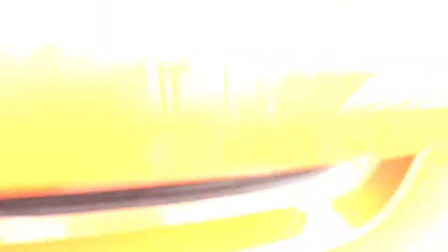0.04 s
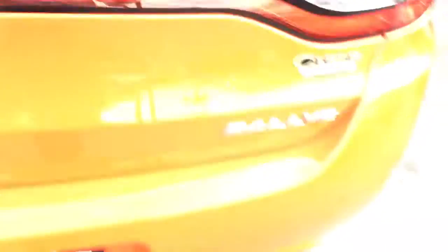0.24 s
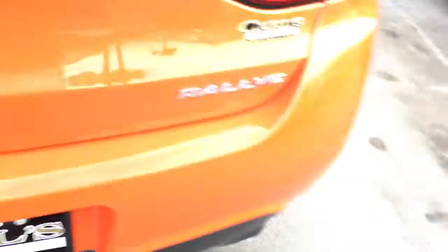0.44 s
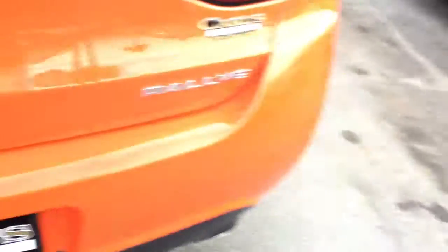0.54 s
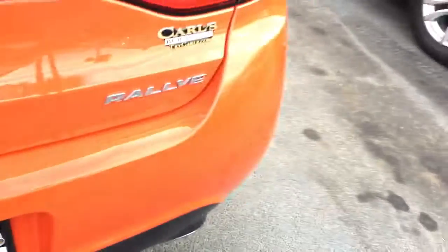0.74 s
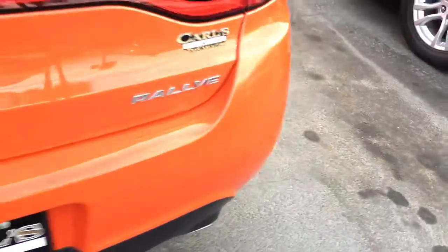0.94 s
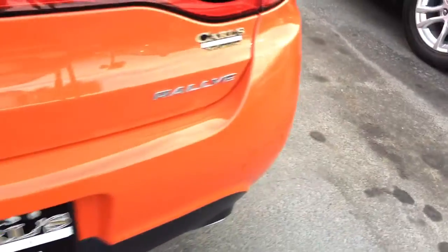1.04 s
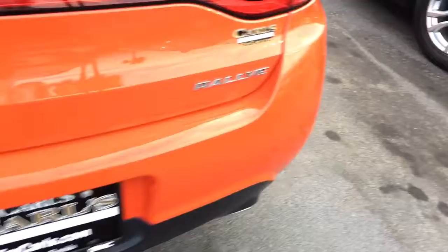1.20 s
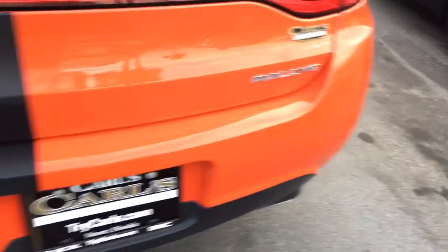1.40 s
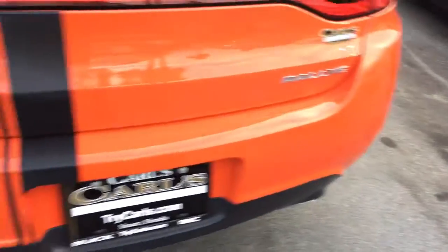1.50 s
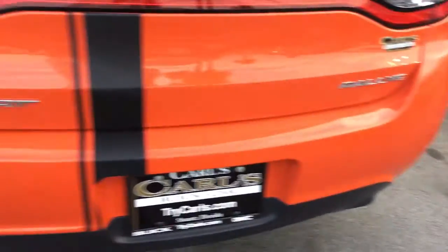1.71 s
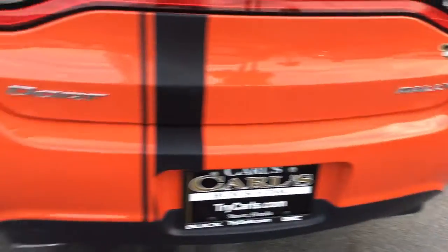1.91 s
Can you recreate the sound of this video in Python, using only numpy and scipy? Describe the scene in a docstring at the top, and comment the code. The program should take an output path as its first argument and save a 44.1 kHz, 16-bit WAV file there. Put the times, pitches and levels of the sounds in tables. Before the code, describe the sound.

One hard car trunk slam with latch clatter and low boom, then quiet idling and wind rumble.

```python
"""Trunk slam beside an idling engine

A car's trunk lid is slammed once, close by, in an open lot: the latch clatters, the panels ring, the air booms.
These are bursts of coloured noise, decaying sines and one low sine, with a diffuse noise tail around them.
Wavering low tones make the engine, shaped noise the wind, the outdoor wash and a few soft scuffs.
The recorder's gain ducks under the slam, holds and recovers."""
import sys
import numpy as np
from scipy import signal
from scipy.fft import rfft, irfft
from scipy.io import wavfile
from scipy.ndimage import uniform_filter1d, minimum_filter1d

SR = 44100
rng = np.random.default_rng(int(sys.argv[2]) if len(sys.argv) > 2 else 0)


def master(y):
    """Save y as 16-bit WAV."""
    cut = np.clip(np.atleast_2d(y).T, -1, 1)
    pcm = np.round(cut * 32767)  # scale
    wavfile.write(sys.argv[1], SR, pcm.astype(np.int16))


N = 85995  # length in samples


def amp(db):
    """Decibels to gain."""
    return 10 ** (np.asarray(db) / 20)


def unit(x):
    """Scales to an rms of one."""
    return x / np.sqrt(np.mean(abs(x) ** 2) + 1e-20)


def read(points, hz):
    """Reads a table on a log-frequency axis."""
    table_hz, value = np.transpose(points)
    return np.interp(np.log(hz + 1), np.log(table_hz), value)


def noise(colour, tilt_db=0):
    """Steady noise of rms one, shaped by a colour table and a tilt in dB per octave."""
    hz = np.fft.rfftfreq(N, 1 / SR)
    shape_db = read(colour, hz) + tilt_db * np.log2(hz + 1)
    white = rfft(rng.standard_normal(N))
    return unit(irfft(white * amp(shape_db), N))


def drift(width_hz):
    """Complex random motion of rms one, kept slow by a Gaussian lowpass."""
    hz = np.fft.fftfreq(N, 1 / SR)
    white = rng.standard_normal(N) + 1j * rng.standard_normal(N)
    return unit(np.fft.ifft(np.fft.fft(white) * np.exp(-(hz / width_hz) ** 2)))


def since(start):
    """Seconds since a moment, zero before it."""
    return np.maximum(np.arange(N) / SR - start, 0)


def decay(t, t60):
    """Exponential fall by 60 dB in t60 seconds."""
    return np.exp(-np.log(1000) * t / t60)


def strike(start, rise, t60):
    """Quick rise and exponential decay."""
    t = since(start)
    return (1 - np.exp(-t / rise)) * decay(t, t60)


# Colour of the fan and distant traffic. Each row: frequency in Hz, relative density in dB per Hz.
WASH_COLOUR = [(30, -5.5), (200, 12), (300, 0.5), (380, 1), (650, -3), (950, 1), (1600, -0.5), (2300, -7),
               (2900, -13.5), (4200, -18), (5000, -21.5), (9000, -27.5), (15500, -39.5)]
WASH_DB = -45


def wash():
    """Fan and distant traffic blend into broad noise whose level barely wavers."""
    level_db = WASH_DB + 0.64 * drift(width_hz=9.9).real
    return amp(level_db) * noise(WASH_COLOUR)


# Colour of wind on the microphone. Each row: frequency in Hz, relative density in dB per Hz.
WIND_COLOUR = [(10, -15), (28, 2.5), (58, 5.5), (100, -4), (160, -9), (260, -25.5), (600, -61)]
# Strength of the wind over time. Each row: time in seconds, level in dB.
GUSTS = [(0, -32.5), (.08, -32.5), (.45, -38), (.62, -27.5), (.75, -42.5), (1.0, -31.5), (1.24, -41.5),
         (1.36, -28.5), (1.52, -35.5), (1.82, -32.5), (1.95, -40)]


def wind():
    """Turbulence buffets the microphone: low rumbling noise that swells and drops in lumps."""
    level_db = np.interp(since(0), *np.transpose(GUSTS))
    return amp(level_db) * noise(WIND_COLOUR)


# Low orders of the idling engine. Each row: frequency in Hz, rms level in dB before waver, waver as a share.
ENGINE_ORDERS = [(30.2, -47.5, 0.34), (60.7, -52.5, 0.44), (92.2, -46, 0.52), (121.5, -53, 0.55),
                 (153.2, -44, 0.39), (183.4, -41, 0.2), (276.8, -59, 0.48), (306.4, -59.5, 0.33),
                 (457, -58.5, .25)]


def engine():
    """Firing and rotation hum at low orders, each wavering in strength and phase."""
    hum = np.zeros(N)
    for hz, db, waver in ENGINE_ORDERS:
        wobble = 1 + waver * drift(width_hz=8.3)
        tone = np.exp(2j * np.pi * (hz * since(0) + rng.random()))
        hum += amp(db) * np.sqrt(2) * (wobble * tone).real
    return hum


# Rubs of shoes and clothing.
# Each row: peak in seconds, rise in seconds, fall in seconds, level in dB, treble tilt in dB per octave.
SCUFFS = [(.085, 0.017, 0.034, -52, -9), (.437, .006, 0.016, -54, 5), (.868, 0.047, .025, -56.5, 10.5),
          (.89, 0.028, 0.035, -54.5, -2.5), (1.455, 0.0083, 0.046, -58, 2.5),
          (1.57, 0.011, 0.055, -55.5, -1)]
# Shared colour of the rubs, before tilt. Each row: frequency in Hz, relative density in dB per Hz.
SCUFF_COLOUR = [(600, -30), (2000, 10.5), (4200, 3), (5000, -3.5), (8500, -9), (15000, -23)]


def scuffs():
    """Shoes and clothing rub softly: short noise swells made grainy by a fast level flutter."""
    t, out = since(0), np.zeros(N)
    for peak, rise, fall, db, tilt_db in SCUFFS:
        swell = np.exp(-((t - peak) / np.where(t < peak, rise, fall)) ** 2 / 2)
        level_db = db + 2.3 * drift(width_hz=160).real
        out += amp(level_db) * swell * noise(SCUFF_COLOUR, tilt_db)
    return out


# Swishes among the scuffs. Each row: start in seconds, length in seconds, level in dB.
SWISHES = [(0.852, 0.098, -54), (1.562, .11, -52)]
SWISH_FROM_HZ, SWISH_TO_HZ, SWISH_GLIDE_S, SWISH_WIDTH_HZ = 4700, 1990, .018, 190


def swishes():
    """A narrow noise resonance slides down in pitch as it swells and fades."""
    out = np.zeros(N)
    for start, length, db in SWISHES:
        t = since(start)
        hz = SWISH_TO_HZ + (SWISH_FROM_HZ - SWISH_TO_HZ) * np.exp(-t / SWISH_GLIDE_S)
        swell = np.sin(np.pi * np.sqrt(np.minimum(t / length, 1)))
        carrier = np.exp(2j * np.pi * np.cumsum(hz) / SR)
        out += amp(db) * swell * (drift(SWISH_WIDTH_HZ) * carrier).real
    return out


# Decay of the scatter from cars and ground. Each row: frequency in Hz, t60 in seconds.
LOT_T60 = [(100, 0.4352), (1000, 0.1974), (4000, 0.4), (15000, 0.32)]
# Colour of the scatter. Each row: frequency in Hz, relative density in dB per Hz.
LOT_COLOUR = [(100, 5.5), (1000, -7), (3000, -3), (15000, -1.5)]
LOT_DB, LOT_DELAY_S, LOT_BUILD_S = -13.5, 0.0066, 0.016


def lot(x):
    """Cars and ground scatter the sound into a short diffuse tail, each band dying at its own speed."""
    hz, t, bands = signal.stft(noise(LOT_COLOUR), SR, nperseg=256)
    fading = bands * decay(t, read(LOT_T60, hz)[:, None])
    tail = signal.istft(fading, SR)[1][:N]
    tail = tail * (1 - np.exp(-since(LOT_DELAY_S) / LOT_BUILD_S))
    return amp(LOT_DB) * signal.fftconvolve(x, tail / np.linalg.norm(tail))[:N]


BOOM_S, BOOM_HZ, BOOM_DB, BOOM_RISE_S, BOOM_T60_S = .2205, 61.9, 1.5, 0.0034, 0.15


def boom():
    """The seal closes and the air trapped in the trunk swings for a few cycles."""
    swing = np.sin(2 * np.pi * BOOM_HZ * since(BOOM_S))
    return amp(BOOM_DB) * strike(BOOM_S, BOOM_RISE_S, BOOM_T60_S) * swing


# Ringing modes of lid and body. Each row: frequency in Hz, level in dB relative to RING_DB, t60 in seconds.
LID_MODES = [(112.8, -12.5, 0.41), (150.4, -14.5, 0.38), (187.5, -9.5, 0.15), (211.2, -12.5, 0.33),
             (265.7, -11.5, 0.29), (298.5, -16, 0.46), (327.3, -14.5, 0.37), (526.3, -14, 0.21),
             (563, -24.5, .25), (753, -26.5, 0.26), (824, -20.5, 0.21), (963, -15, .22), (1316, -40, .17),
             (1518, -20, 0.18)]
LAND_S, RING_DB, RING_RISE_S = .2035, 2.5, 0.0093


def ring():
    """The lid's strongest modes ring on after it lands, each a decaying sine."""
    out = np.zeros(N)
    for hz, db, t60 in LID_MODES:
        tone = np.sin(2 * np.pi * (hz * since(LAND_S) + rng.random()))
        out += amp(db) * strike(LAND_S, RING_RISE_S, t60) * tone
    return amp(RING_DB) * out


# Latch contact, lid landing and rebounds. Each row: start in seconds,
# latch crack in dB relative to LATCH_DB, panel clank in dB relative to PANEL_DB.
BLOWS = [(0.1961, -7.5, -14.5), (0.2023, -6, -6), (0.2073, 3, -5.5), (0.2116, 1.5, 0), (0.2174, -6, -5.5),
         (0.2224, -2.5, -4), (.229, 2, -4.5), (0.2418, -2.5, -5), (.249, -31, -4.5), (0.278, -27, -12.5),
         (.304, -34, -20), (.336, -22.5, -38)]
# Colour of the steel latch. Each row: frequency in Hz, relative density in dB per Hz.
LATCH_COLOUR = [(300, -29), (1200, 10.5), (2300, 5.5), (2900, -0.5), (4400, 2.5), (5000, -9.5), (5600, 1.5),
                (8000, -4.5), (12000, -8.5), (16000, -11)]
# Colour of the lid's panels. Each row: frequency in Hz, relative density in dB per Hz.
PANEL_COLOUR = [(80, -25.5), (190, 7.5), (330, 3.5), (430, -12), (540, -2.5), (680, -5.5), (850, -7.5),
                (1400, -12.5), (2300, -15), (2900, -23), (8000, -37)]
LATCH_DB, LATCH_T60_S, PANEL_DB, PANEL_T60_S = -11.5, .035, -0.5, 0.066


def clatter():
    """Each blow cracks the latch and shakes the dense, well-damped modes of the panels."""
    out = np.zeros(N)
    for start, latch_db, panel_db in BLOWS:
        crack = noise(LATCH_COLOUR) * strike(start, .0003, LATCH_T60_S)
        clank = noise(PANEL_COLOUR) * strike(start, .001, PANEL_T60_S)
        out += amp(LATCH_DB + latch_db) * crack + amp(PANEL_DB + panel_db) * clank
    return out


def scene():
    """The slam and its scatter over the idling lot."""
    background = wash() + wind() + engine()
    slam = boom() + ring() + clatter()
    return (background + scuffs() + swishes() + lot(slam) + slam)[None]


LIMIT_DB, HOLD_S, RECOVER_DB_PER_S = -7.5, 0.17, 27.5
CEILING, EDGE_HZ = 0.73, 15850  # ceiling as a share of full scale


def record(dry):
    """Gain control ducks, holds and recovers; peaks are rounded off; then the band limit."""
    power = uniform_filter1d(dry[0] ** 2, size=220)
    power_db = 10 * np.log10(abs(power) + 1e-12)
    over_db = np.maximum(power_db - LIMIT_DB, 0)
    # Adding the ramp, keeping the peak and removing the ramp gives a straight fall in dB.
    fall_db = since(0) * RECOVER_DB_PER_S
    released_db = np.maximum.accumulate(over_db + fall_db) - fall_db
    # The largest reduction over the past hold time.
    half_hold = int(HOLD_S * SR) // 2
    held_db = -minimum_filter1d(-released_db, 2 * half_hold + 1, origin=half_hold, mode="nearest")
    ducked = dry * amp(-uniform_filter1d(held_db, size=90))
    rounded = ducked / (1 + (ducked / CEILING) ** 6) ** (1 / 6)
    lowpass = signal.firwin(511, EDGE_HZ, window=("kaiser", 9), fs=SR)
    return signal.oaconvolve(rounded, lowpass[None], "same")


dry = scene()
out = record(dry)
master(out)
```